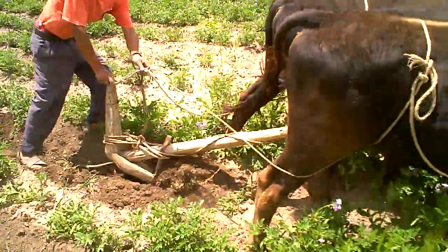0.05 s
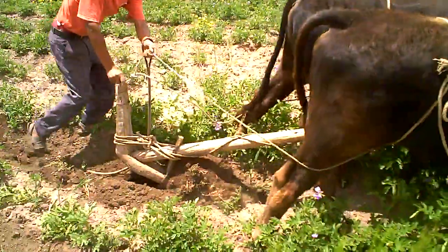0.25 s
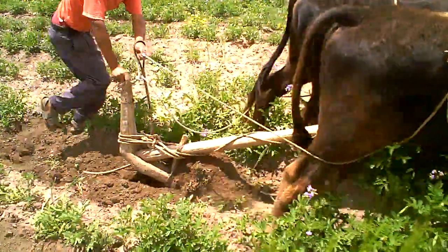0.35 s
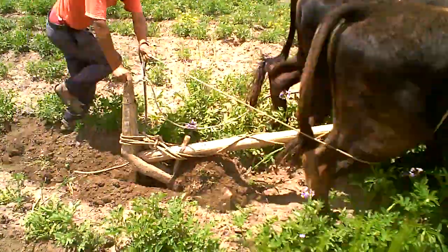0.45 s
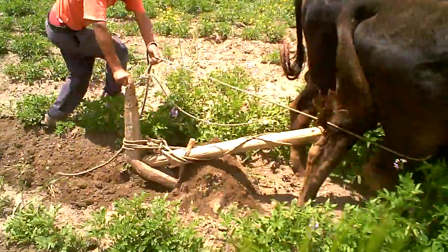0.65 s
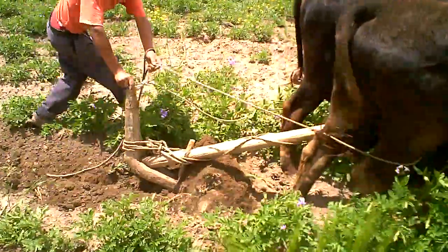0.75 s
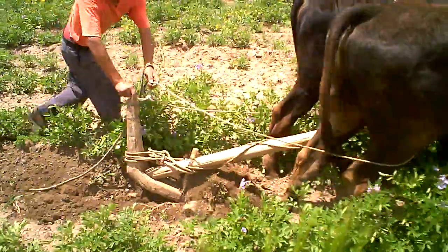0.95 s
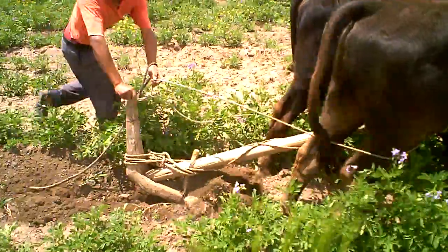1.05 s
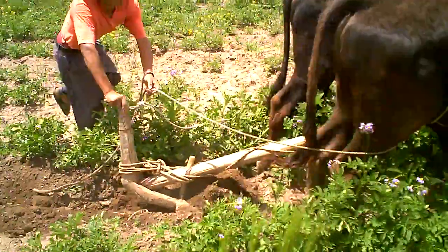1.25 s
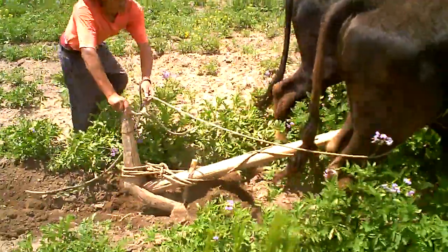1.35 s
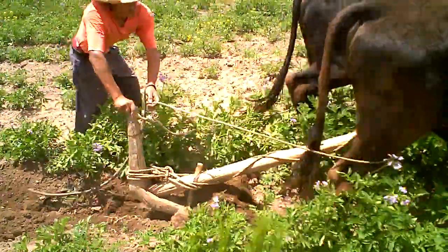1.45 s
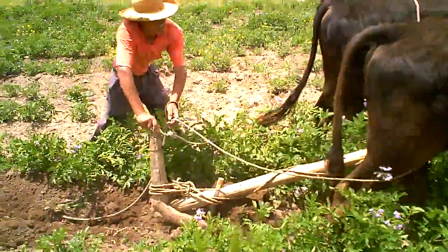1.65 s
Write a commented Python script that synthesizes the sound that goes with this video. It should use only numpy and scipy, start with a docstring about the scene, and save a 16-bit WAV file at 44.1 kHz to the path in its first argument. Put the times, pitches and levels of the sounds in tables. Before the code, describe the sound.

In an open field, a wooden plough gives a single dead knock near the microphone. Soil trickles and plants rustle faintly over a soft hiss, followed by a few stalk snaps and one brief, small creak.

```python
"""Oxen draw a wooden plough through a dry, leafy field, open ground where nothing echoes.
From the start, over a faint hiss, soil slides off the share and plants brush, scuff and snap.
At 0.22 s comes the main sound, close by: an impact on wood, heard as one short, dead knock.
The faint rustle carries on, with sharper snaps near 0.7 s and one small stick-slip creak of the rig
at 1.08 s. A few more snaps follow before the end."""
import sys
import numpy as np
from scipy import signal
from scipy.fft import rfft, irfft, next_fast_len
from scipy.io import wavfile
from scipy.ndimage import map_coordinates

SR = 44100
rng = np.random.default_rng(int(sys.argv[2]) if len(sys.argv) > 2 else 0)


def transcribe(u):
    """Save the signal u as a 16-bit wav file named by the first command-line argument.

    u: samples, shape (n,) or (channels, n), limited to [-1, 1]; the rate is SR.
    q: integer samples, one column per channel.
    """
    v = np.clip(np.atleast_2d(u).T, -1, 1)
    q = np.round(v * 32767).astype(np.int16)
    wavfile.write(sys.argv[1], SR, q)


N = 74970  # 1.7 s


def amp(db):
    """The decibel scale: 20 dB is a factor of ten in amplitude."""
    return 10 ** (np.asarray(db) / 20)


def unit(x):
    """Normalisation to an rms of 1."""
    return x / np.sqrt(np.mean(x ** 2) + 1e-20)


def envelope(rows):
    """Amplitude envelope, interpolated in decibels between (seconds, dB) points."""
    return amp(np.interp(np.arange(N) / SR, *np.transpose(rows)))


def swell(t, length):
    """Half-sine window: a rounded rise and fall."""
    return np.sin(np.pi * np.clip(t / length, 0, 1))


def wobble(rate):
    """Random modulation: a spline through rate Gaussian values a second."""
    return map_coordinates(rng.standard_normal(N // 20), [np.arange(N) * rate / SR])


def filtered(x, response):
    """Linear filtering: the spectrum of x is multiplied by a frequency response."""
    size = next_fast_len(len(x) + SR // 4)
    hz = np.fft.rfftfreq(size, 1 / SR) + 1
    return irfft(rfft(x, size) * response(hz), size)[:len(x)]


def coloured(x, points):
    """Spectral shaping by (Hz, dB) points, normalised to an rms of 1."""
    f, db = np.transpose(points)
    return unit(filtered(x, lambda hz: amp(np.interp(np.log(hz), np.log(f), db))))


def resonance(f, hz, width):
    """Resonance curve: the gain peaks at hz and falls steeply on both sides."""
    return 1 / (1 + ((f / hz - hz / f) * hz / width) ** 2)


def add(track, start, sound):
    """Superposition: a sound adds to the track from start, in seconds."""
    part = track[max(round(start * SR), 0):][:len(sound)]
    part += sound[:len(part)]


def grains(rate, spread_db):
    """Shot noise: tiny independent contacts of uneven size, on average rate a second."""
    hits = rng.random(N) < rate / SR
    signs = rng.choice([-1, 1], N)
    sizes = amp(spread_db * np.clip(rng.standard_normal(N), -2, 2))
    return unit(hits * signs * sizes)


# Spectrum of the hiss. Each row: frequency in Hz, relative density in dB.
AIR_SPECTRUM = [(20, -24), (200, -5), (600, 5), (3000, 1), (7000, -3.5), (11000, -11), (15500, -9.5)]
def air(level_db=-75):
    """Stationary broadband noise, heard as a steady hiss."""
    return amp(level_db) * coloured(rng.standard_normal(N), AIR_SPECTRUM)


# Envelopes of the sliding soil and the ground's rumble. Each row: time in seconds, level in dB.
SLIDE_LEVELS = [(0, -67.5), (.11, -65), (.2, -69), (.3, -70), (.55, -69), (.72, -67.5), (.9, -68.5),
                (1.2, -70), (1.4, -68), (1.7, -69.5)]
RUMBLE_LEVELS = [(0, -86), (.1, -82), (.16, -72), (.23, -76.5), (.31, -76.5), (.38, -92.5), (.56, -86.5),
                 (.7, -87.5), (1.1, -89), (1.3, -94.5), (1.7, -97.5)]
# Their spectra. Each row: frequency in Hz, relative density in dB.
SLIDE_SPECTRUM = [(30, -35), (90, -21.5), (160, -10.5), (300, -1.5), (700, 1.5), (1300, -2), (2200, -6.5),
                  (4000, -13), (9000, -24.5), (15500, -34.5)]
RUMBLE_SPECTRUM = [(20, -17.5), (60, -7), (110, -3.5), (170, 0), (300, -9.5), (700, -34.5)]
def soil():
    """Granular flow: crumbs pour off the share and merge into noise, over a low rumble of the ground."""
    crumbs = grains(rate=1600, spread_db=1.5) + rng.standard_normal(N)
    slide = envelope(SLIDE_LEVELS) * amp(.8 * wobble(40)) * coloured(crumbs, SLIDE_SPECTRUM)
    rumble = envelope(RUMBLE_LEVELS) * coloured(rng.standard_normal(N), RUMBLE_SPECTRUM)
    return slide + rumble


# Envelope of plants brushing legs and plough. Each row: time in seconds, level in dB.
BRUSH_LEVELS = [(0, -74), (.09, -76), (.18, -79), (.33, -75.5), (.41, -71.5), (.5, -69), (.54, -71),
                (.61, -69), (.66, -62.5), (.73, -65.5), (.79, -72), (.9, -76), (.96, -70.5), (1.05, -76),
                (1.2, -76), (1.42, -77.5), (1.55, -72), (1.7, -74)]
# Spectrum of the leaves. Each row: frequency in Hz, relative density in dB.
LEAF_SPECTRUM = [(300, -21), (1000, -6), (2000, -1), (4500, 3), (7500, -2), (10000, -7.5), (12500, -14.5),
                 (15500, -20)]
def plants():
    """Sliding friction: leaves rub and tick in small clumps."""
    contacts = grains(rate=2500, spread_db=3.5) + .9 * rng.standard_normal(N)
    clumps = amp(1.2 * wobble(90))
    return envelope(BRUSH_LEVELS) * clumps * coloured(contacts, LEAF_SPECTRUM)


# Rubs of grit and stems. Each row: start and length in seconds, level in dB, centre and width in Hz.
RUBS = [(.0, 0.071, -64.5, 1710, 497), (0.472, .05, -72.5, 8800, 6000), (.722, 0.012, -61, 4800, 3000),
        (0.845, 0.009, -64.5, 2200, 1800), (.932, 0.019, -65.5, 4900, 2800),
        (1.081, 0.0093, -59.5, 5800, 2970), (1.103, 0.0088, -64.5, 1350, 700),
        (1.555, 0.017, -64, 4480, 1200)]
def scuffs():
    """Band-limited friction noise: each brief rub swells and fades in its own band."""
    out, t = np.zeros(N), np.arange(SR // 5) / SR
    for start, length, db, hz, width in RUBS:
        rub = unit(filtered(rng.standard_normal(len(t)), lambda f: resonance(f, hz, width)))
        add(out, start, amp(db) * rub * swell(t, length))
    return out


# Frequency response of the rig. Each row: frequency in Hz, relative gain in dB.
RIG_RESPONSE = [(300, -18), (750, 0), (1500, -1.5), (2300, -2.5), (3200, -7), (4500, -2), (7000, -20),
                (14000, -32)]
def creak(start=1.083, level_db=-61.5, first_hz=779.5, last_hz=725, count=19):
    """Stick-slip friction: wood and rope catch and release in a short run of pulses that slow down."""
    out, slips = np.zeros(N), np.zeros(SR // 10)
    scatter, size_db = rng.standard_normal((count, 2)).T
    periods = 1 / np.linspace(first_hz, last_hz, count)
    times = np.cumsum(periods) + .022 * scatter / first_hz  # jitter of about 2 % of a cycle
    slips[np.round(times * SR).astype(int)] = amp(size_db)
    active_share = times[-1] * SR / len(slips)  # makes the level the rms while the slips last
    add(out, start, amp(level_db) * coloured(slips, RIG_RESPONSE) * np.sqrt(active_share))
    return out


# Stalks snapping and crumbs landing. Each row: start in seconds, ring level in dB, ring frequency
# in Hz, time to decay by 60 dB in seconds, crack level relative to the ring in dB.
SNAP_EVENTS = [(.0100, -56, 1900, 0.058, -14), (0.0443, -64, 1830, 0.027, -22),
               (.0632, -59, 3370, .012, -11.5), (0.0898, -55.5, 3350, 0.012, 2),
               (0.6991, -44, 1915, 0.013, -3), (0.7107, -46.5, 3970, .006, -6),
               (.7600, -52, 8600, 0.0043, -0.5), (.8205, -58, 2060, 0.021, -15),
               (.8595, -55.5, 900, 0.017, -5), (1.3030, -55.5, 2670, 0.012, -3),
               (1.4590, -59, 4600, 0.0068, -2), (1.5487, -49.5, 4360, 0.0078, -8.5),
               (1.5665, -46.5, 850, 0.0089, -24), (1.6412, -57.5, 2010, 0.012, -4),
               (1.6834, -56, 2000, 0.011, 0)]
# Spectrum of the crack. Each row: frequency in Hz, relative density in dB.
CRACK_SPECTRUM = [(300, -10.5), (1000, -9.5), (2000, 0.5), (4500, 3.5), (8000, -5), (11000, -12.5),
                  (15500, -22)]
def snaps(crack_t60=0.0076, low_cut_hz=300):
    """Damped free vibration: each dry crack leaves a brief ring; such small bodies radiate no bass."""
    out, t = np.zeros(N), np.arange(SR // 20) / SR
    for start, db, hz, t60, crack_db in SNAP_EVENTS:
        ring = np.sin(2 * np.pi * hz * t) * amp(-60 * t / t60)
        noise = coloured(rng.standard_normal(len(t)), CRACK_SPECTRUM)
        crack = noise * amp(crack_db - 60 * t / crack_t60)
        add(out, start, amp(db) * (ring + crack))
    return signal.sosfilt(signal.butter(2, low_cut_hz, "high", fs=SR, output="sos"), out)


# Broad peaks in the dull knock's spectrum. Each row: frequency in Hz, width in Hz, gain in dB.
KNOCK_PEAKS = [(244, 130, 7), (467, 241, 13), (651, 200, 24), (836.5, 280, 25.5), (1016, 270, 21.5),
               (1786, 290, 8), (2660, 430, 0.5), (3359, 560, -1.5), (4500, 865, -11), (5986, 930, -18.5),
               (8090, 2200, -29.5), (14090, 6500, -36)]
# A 3 ms burst of bright noise at the knock's onset. Each row: frequency in Hz, relative density in dB.
BURST_SPECTRUM = [(2000, -15), (5000, -0.5), (9000, -2), (12000, -5.5), (15500, -1.5)]
def knock(start=.2193, gain_db=-0.5, burst_db=-56.5, burst_s=.003):
    """Impact transient: broad spectral peaks mean a fast decay, here about ten milliseconds."""
    size = 16384
    f, t = np.fft.rfftfreq(size, 1 / SR) + 1, np.arange(SR // 40) / SR
    power = sum((amp(db) * resonance(f, hz, width)) ** 2 for hz, width, db in KNOCK_PEAKS) + 1e-5
    dip = amp(-17 * resonance(f, hz=2165, width=150))  # a dip near 2.2 kHz
    cepstrum = irfft(np.log(np.sqrt(power) * dip))
    # Folding the cepstrum gives minimum phase: the knock starts abruptly, then decays.
    fold = np.r_[1, np.full(size // 2 - 1, 2), 1, np.zeros(size // 2 - 1)]
    body = irfft(np.exp(rfft(cepstrum * fold)))[:len(t)]
    burst = coloured(rng.standard_normal(len(t)), BURST_SPECTRUM) * swell(t, burst_s)
    out = np.zeros(N)
    add(out, start, amp(gain_db) * body + amp(burst_db) * burst)
    return out


def scene():
    """Free-field superposition: the direct sounds add in one channel, without reflections."""
    return (air() + knock() + plants() + soil() + snaps() + scuffs() + creak())[None]


def record(dry):
    """Band limiting: a steep low-pass filter removes the highest treble."""
    cutoff_hz = 15800
    return filtered(dry[0], lambda hz: 1 / np.sqrt(1 + (hz / cutoff_hz) ** 160))[None]


dry = scene()
out = record(dry)
transcribe(out)
```